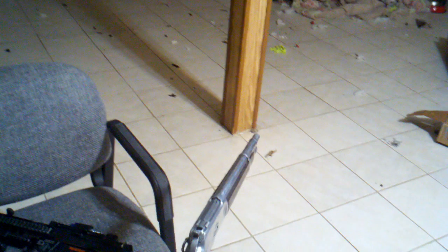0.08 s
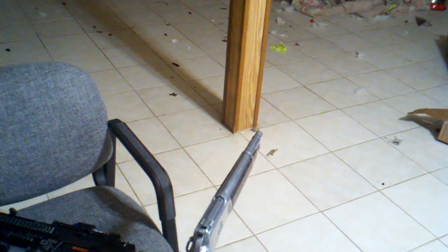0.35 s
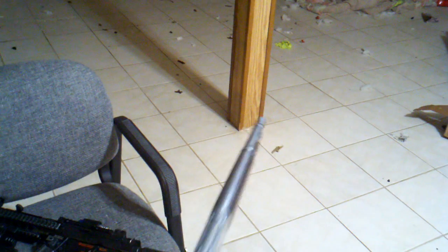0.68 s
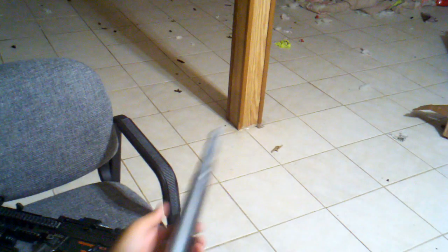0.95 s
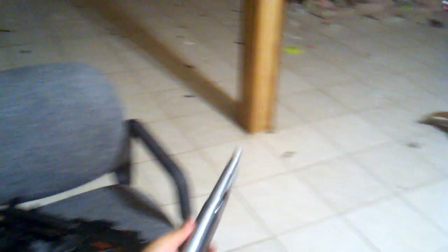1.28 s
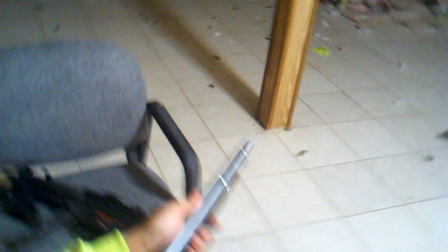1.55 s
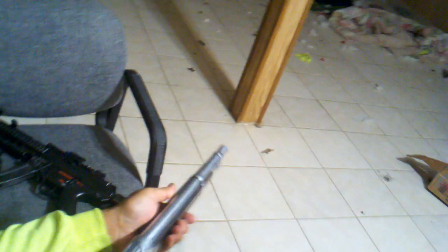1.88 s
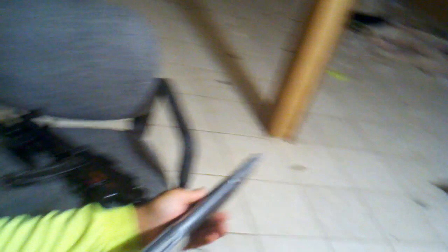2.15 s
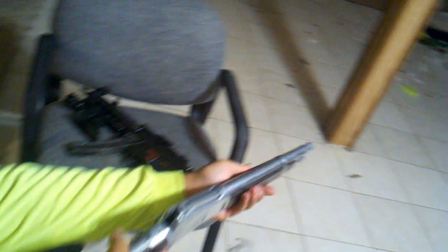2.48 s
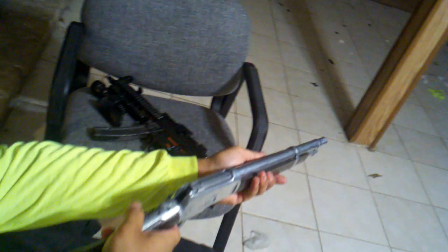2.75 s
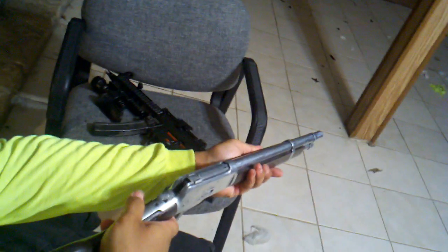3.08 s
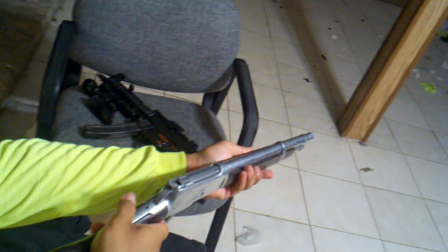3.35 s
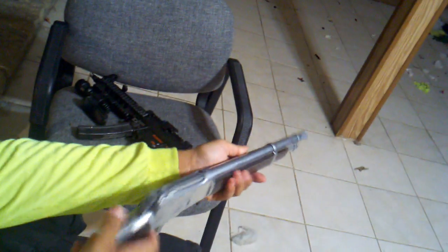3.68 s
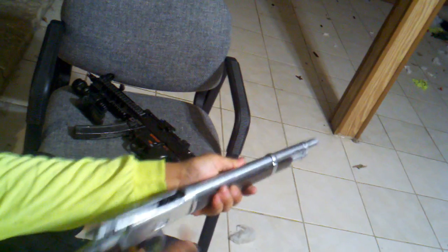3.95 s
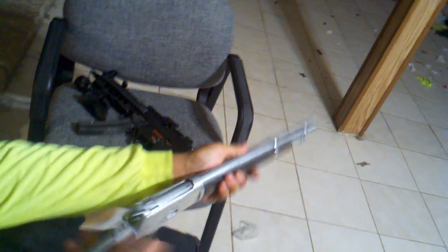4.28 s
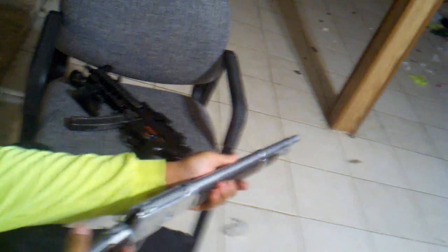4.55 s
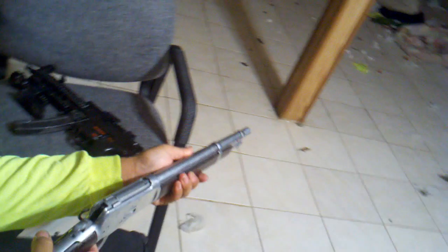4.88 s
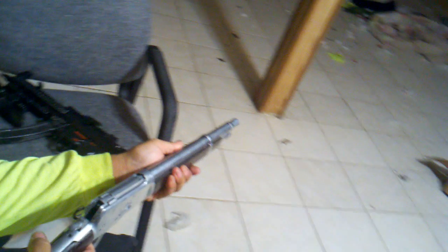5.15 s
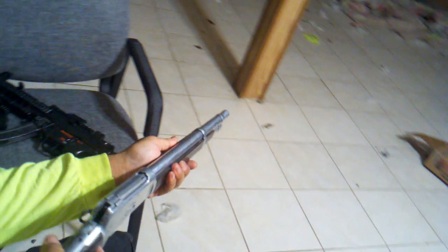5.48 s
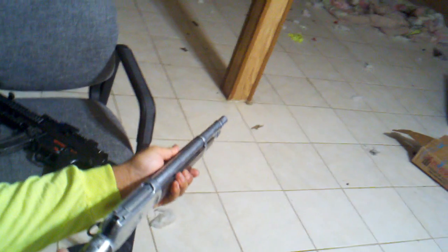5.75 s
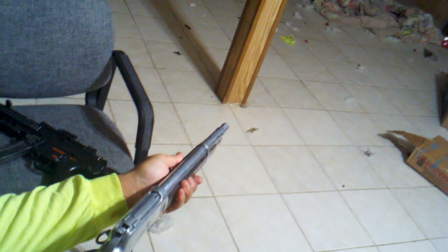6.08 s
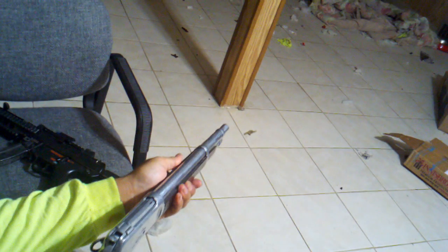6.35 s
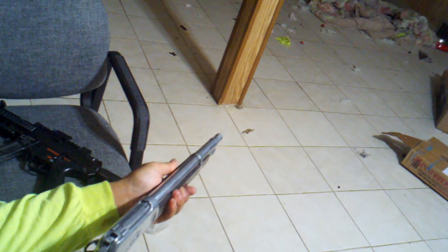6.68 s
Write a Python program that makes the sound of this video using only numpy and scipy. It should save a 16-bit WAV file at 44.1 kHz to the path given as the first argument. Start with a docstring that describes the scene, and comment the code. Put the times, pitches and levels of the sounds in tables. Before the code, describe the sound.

A tiled room rings from an airsoft rifle shot just fired. The rifle's metal lever scrapes open with a click and snaps shut. A sharp crack follows, and the pellet ticks across the room. The lever is worked again, a last shot and its pellet ring out, and a sleeve brushes faintly past. A fan hums softly throughout. The microphones are close, with a wide stereo sound.

```python
"""A tiled room rings from a shot of a spring-powered airsoft rifle, and a fan hums faintly throughout.
The rifle's lever scrapes open, loading the spring, and snaps shut. The next shot is a trigger click,
a rush of the piston, a pop at the muzzle and the piston's slam; the pellet strikes across the room.
The lever is worked again, a last shot and its pellet follow, and a sleeve brushes past.
All is heard through two close microphones, widened in stereo and turned down after loud sounds."""
import sys
import numpy as np
from scipy import signal
from scipy.fft import rfft, irfft, next_fast_len
from scipy.io import wavfile

SR = 44100
rng = np.random.default_rng(int(sys.argv[2]) if len(sys.argv) > 2 else 0)


def master_out(mix):
    """Clip the mix to full scale and print it as 16-bit PCM to the path in sys.argv[1]."""
    frames = np.transpose(np.atleast_2d(mix))
    ceiling = np.clip(frames, -1, 1)
    pcm = np.round(ceiling * 32767).astype(np.int16)
    wavfile.write(sys.argv[1], SR, pcm)


N = 300762
LEAD = SR // 2  # extra samples, so that sound begun before time zero still rings
TIME = np.arange(-LEAD, N) / SR
EDGE_HZ = 14150  # upper limit of the sound

# tone of a sharp bang heard from across the room: f/Hz, level/dB
FAR_BANG = [(60, -23.5), (170, -5.5), (290, -1), (370, 3), (700, 0), (1200, -0.5), (2000, -0.5),
            (2700, -5.5), (3600, -4.5), (5000, -7.5), (7000, -2.5), (9000, -1.5), (14000, -10)]
# the lever swings open until the sear, a hook that holds the loaded spring, catches:
# start t/s, sear t/s, latch's lead on the sear/s, teeth level/dB, scrape level/dB, sear level/dB
LEVER_OPENS = [(1.1913, 1.2739, .0066, -23, -38, -6.5), (3.8739, 3.965, 0.0094, -26.5, -36, -12)]
# the lever swings back: start t/s, shut t/s, rattle level/dB, scrape level/dB, snag level/dB, stop level/dB
LEVER_SHUTS = [(1.588, 1.6485, -23.5, -31.5, -14.5, -11), (4.2965, 4.355, -23, -26, -29, -11)]


def amp(db):
    """Turns decibels into a gain."""
    return 10 ** (np.asarray(db) / 20)


def value_at(points, hz):
    """Looks up a table between its rows, on a logarithmic frequency scale."""
    f, value = np.transpose(points)
    return np.interp(np.log(hz + 1), np.log(f), value)


def add(mix, s, sound):
    """Mixes a sound in at s seconds."""
    part = mix[:, LEAD + round(s * SR):][:, :sound.shape[-1]]
    part += sound[..., :part.shape[1]]


def colour(x, points, keep_power=True, size=4096):
    """Gives x the tone in a table; with keep_power, white noise keeps about the same strength."""
    gain = amp(value_at(points, abs(np.fft.fftfreq(size, 1 / SR))))
    if keep_power:
        gain = gain / np.sqrt(np.mean(gain[:round(size * EDGE_HZ / SR)] ** 2))
    taps = np.fft.ifft(np.exp(signal.hilbert(np.log(gain)).conj())).real  # never rings ahead of a hit
    return signal.oaconvolve(x, taps[None, :size // 2], axes=1)[:, :x.shape[1]]


def resonate(x, hz, width_hz):
    """Makes x ring at a pitch, which may be steady or gliding."""
    turn = np.exp(2j * np.pi * np.cumsum(hz * np.ones(x.shape[1])) / SR)
    feedback = np.exp(-np.pi * width_hz / SR)
    return 2 * (turn * signal.lfilter([1 - feedback], [1, -feedback], x / turn + 1e-18)).real


def burst(db, decay_s, size=4096):
    """Parts chatter as they touch: a sudden start and a quick end, with all pitches equally strong."""
    fade = np.exp(-np.arange(size) / SR / decay_s)
    spectrum = rfft(rng.standard_normal((2, size)) * fade)
    click = irfft(spectrum / abs(spectrum))[:, :size // 2]
    return amp(db) * click * np.linalg.norm(fade) / np.linalg.norm(click, axis=1, keepdims=True)


def puff(db, hz, rise_s, size=2048):
    """A push of air in the first channel: it swells, swings back and dies within a few cycles."""
    t = np.arange(size) / SR
    swell = (t / rise_s * np.exp(1 - t / rise_s)) ** 2
    return amp(db) * np.sin(2 * np.pi * hz * t) * swell * np.array([[1], [0]])


def shots(stock_db=-18, metal_to_room_db=-10, thump_hz=235, thump_decay_s=0.0015, right_share=0.34):
    """A spring slams a piston home. Returns the near sound, the push of air and what enters the room."""
    # slam t/s, slam level/dB, trigger level/dB, muzzle pop level/dB, air push level/dB, blast level/dB
    firings = [(-.112, -7, -12, -6, 0, 26.5), (3.1952, 8.5, -25, -1, 14.5, 22),
               (6.0096, 11.5, -16, -9, -3, 25.5)]
    # tone of the piston's slam: f/Hz, level/dB
    slam_tone = [(40, 0), (150, 3), (400, 2.5), (1200, -2.5), (2500, 0.5), (4000, -1.5), (5200, -0.5),
                 (6600, -0.5), (7800, -2), (9100, 4), (10200, 0), (11300, 1), (14000, -5.5)]
    metal, pop, push, stock, blast = np.zeros((5, 2, len(TIME)))
    t = np.arange(2048) / SR
    thump = np.sin(2 * np.pi * thump_hz * t) * np.exp(-t / thump_decay_s)
    for s, db, trigger_db, pop_db, push_db, blast_db in firings:
        add(metal, s - 0.0168, burst(trigger_db, decay_s=0.004))
        add(metal, s - 0.0066, burst(db - 22, decay_s=0.028))  # the freed spring drives the piston
        add(metal, s - 0.0016, burst(db - 17.5, decay_s=0.0057))
        add(pop, s - 0.0028, puff(pop_db, hz=1318, rise_s=0.0003))  # air leaves the muzzle
        add(metal, s, burst(db, decay_s=0.0016))  # the piston hits the end of its cylinder
        add(metal, s + 0.0033, burst(db - 16, decay_s=0.019))  # the spring shudders
        add(push, s, amp(push_db) * thump * np.array([[1], [right_share]]))
        add(stock, s, burst(db + stock_db, decay_s=0.002))  # the hollow stock takes the blow
        add(blast, s, amp(blast_db) * np.ones(1))  # from afar the shot is one sharp spike
    metal = colour(metal, slam_tone)
    knock = amp(12) * resonate(stock, hz=490, width_hz=340)
    return metal + pop + knock, push, colour(blast, FAR_BANG) + amp(metal_to_room_db) * metal


def room(x, build_s, gap_s):
    """Echoes off the tiles swell after a short gap, then each pitch dies at its own speed."""
    # how long the room rings: f/Hz, time to fade by 60 dB/s
    ring_times = [(100, 0.8), (350, 0.51), (700, 0.58), (1500, 0.66), (3500, 0.71), (6000, .62),
                  (9000, 0.54), (13500, 0.48)]
    hz, t, noise = signal.stft(rng.standard_normal((2, SR)), SR, nperseg=256)
    fade = np.exp(-np.log(1000) * t / value_at(ring_times, hz)[:, None])
    tail = signal.istft(noise * fade, SR, nperseg=256)[1][:, :SR]
    tail *= 1 - np.exp(-np.maximum(np.arange(SR) / SR - gap_s, 0) / build_s)
    return signal.fftconvolve(x, tail / np.linalg.norm(tail[0]), axes=1)[:, :len(TIME)]


def fan(air_db=-58, side_db=-10, boost_db=5, volume_creep_db_per_s=0.6733):
    """A steady fan's soft rush of air and hum, heard gradually louder as the microphone volume creeps up."""
    # tone of the moving air: f/Hz, level/dB
    air_tone = [(30, -21.5), (70, -9.5), (120, -4.5), (210, 2), (320, 2), (520, -1.5), (750, -7.5),
                (1100, -13), (2000, -15), (3000, -21), (3800, -23), (5200, -28.5), (9000, -26),
                (14000, -26)]
    # the hum's tones: f/Hz, level/dB before the boost and volume creep
    hum_tones = [(226, -75.5), (510.7, -58), (570, -73.5)]
    air = amp(air_db) * microphones(colour(rng.standard_normal((2, len(TIME))), air_tone))
    hum = sum(amp(db) * np.sqrt(2) * np.cos(2 * np.pi * hz * TIME) for hz, db in hum_tones)
    lean_left = amp(side_db) * hum * np.array([[1], [-1]])
    return (air + hum + lean_left) * amp(boost_db + volume_creep_db_per_s * TIME)


def lever_clicks(rattle_times_s=(0, 0.006, 0.018), rattle_rise_db_per_s=153):
    """Parts meet, each click given as t/s, level/dB, decay/s, relative knock/dB, relative ping/dB."""
    # teeth passed as the lever opens: t/s from the start of the swing
    teeth = [0, .0185, .0298, .0415, .0595]
    # the rifle ticks in the hands: t/s, level/dB, relative knock of the stock/dB
    hand_ticks = [(1.0524, -32.5, -4), (1.0785, -49.5, 12), (3.71, -47, 7), (4.2085, -34, -5),
                  (4.287, -33, -7), (4.384, -25, 0.5)]
    # kinds of click: decay/s, relative knock/dB, relative ping/dB
    tooth, catch = (0.0026, -12.5, 3), (0.0024, -27, 7.2)
    rattle, snag, stop = (0.0087, -18, -1), (0.0018, -14, -2), (0.0017, 0, 4.6)
    for start, sear, latch_lead, teeth_db, _, sear_db in LEVER_OPENS:
        yield start - 0.017, teeth_db - 12, *tooth  # slack is taken up just before the lever moves
        for after in teeth:
            yield start + after, teeth_db, *tooth
        yield sear - latch_lead, sear_db - 6.5, *catch  # the latch
        yield sear, sear_db, *catch
    for start, shut, rattle_db, _, snag_db, stop_db in LEVER_SHUTS:
        for after in rattle_times_s:  # the rattle grows with speed
            yield start + after, rattle_db - rattle_rise_db_per_s * (rattle_times_s[-1] - after), *rattle
        yield start + 0.025, snag_db, *snag
        yield shut, stop_db, *stop
    for s, db, knock_db in hand_ticks:
        yield s, db, 0.0024, knock_db, -11.5


def lever_scrapes(free_s=0.011):
    """Sliding parts stick and slip, but run free just before shutting. Yields start time and sound."""
    slides = [(start, sear, db) for start, sear, _, _, db, _ in LEVER_OPENS]
    slides += [(start, shut - free_s, db) for start, shut, _, db, _, _ in LEVER_SHUTS]
    for start, end, db in slides:
        size = max(round((end - start) * SR), 64)
        grip = amp(3.2 * rng.standard_normal(SR // 64)).repeat(64)[:size]
        grit = rng.standard_normal((2, SR))[:, :size] * grip
        yield start, amp(db) * grit / grit.std() * signal.windows.tukey(size, 0.2)


def lever_pitches(slack_hz=1580, loaded_hz=1780, return_hz=1710, shut_hz=1460, load_s=0.015):
    """The ring jumps up as the spring loads and sinks as the lever returns: t/s, ring f/Hz, ping f/Hz."""
    ping_out_hz, ping_back_hz = 12000, 13300
    for (start, sear, *_), (back, shut, *_) in zip(LEVER_OPENS, LEVER_SHUTS):
        yield start, slack_hz, ping_out_hz
        yield sear - load_s, slack_hz, ping_out_hz
        yield sear, loaded_hz, ping_out_hz
        yield back, return_hz, ping_back_hz
        yield shut, shut_hz, ping_back_hz


def lever():
    """Clicks and scrapes ring the steel and knock the stock. Returns near sound and what enters the room."""
    # tone of the steel parts: f/Hz, level/dB
    steel_tone = [(100, -11), (500, -10.5), (900, -14.5), (1400, 3), (2300, 1.5), (3800, 1.5), (4800, 4.5),
                  (5600, -2.5), (6400, 7), (7400, 1), (8800, 6.5), (10400, 0.5), (12000, 0), (14000, -10.5)]
    # tone of the hollow stock, the part held to the shoulder: f/Hz, level/dB
    stock_tone = [(40, -14.5), (150, -12), (300, -6), (550, 0.5), (900, -5), (1400, 2.5), (2400, -5.5),
                  (5000, 1.5), (14000, -48)]
    shaking, knocks, pings = np.zeros((3, 2, len(TIME)))
    for s, db, decay_s, knock_db, ping_db in lever_clicks():
        add(shaking, s, burst(db, decay_s))
        add(pings, s, burst(db + ping_db, decay_s))
        add(knocks, s, burst(db + knock_db, decay_s=0.0029))
    for s, scrape in lever_scrapes():
        add(shaking, s, scrape)
    times, ring_hz, ping_hz = np.transpose(list(lever_pitches()))
    steel = amp(-1) * colour(shaking, steel_tone)
    knock = colour(knocks, stock_tone)
    ring = amp(7) * resonate(shaking, np.interp(TIME, times, ring_hz), width_hz=140)
    ping = amp(5.5) * resonate(pings, np.interp(TIME, times, ping_hz), width_hz=850)
    to_room = amp(-6) * steel + amp(-6.5) * ring + amp(-18) * ping + amp(-12) * knock
    return steel + ring + ping + knock, to_room


def jolts(relative_db=-27):
    """Each swing of the lever ends by jerking the rifle: a soft low thud in the left microphone."""
    thuds = np.zeros((2, len(TIME)))
    for _, s, *_, db in LEVER_OPENS + LEVER_SHUTS:
        add(thuds, s, puff(db + relative_db, hz=100, rise_s=0.0016))
    return thuds


def pellets():
    """A plastic pellet strikes and bounces some way off."""
    # hits across the room: t/s, level/dB
    strikes = [(3.2264, -13.5), (3.239, -11), (6.039, -4.5), (6.099, -7)]
    hits = np.zeros((2, len(TIME)))
    for s, db in strikes:
        add(hits, s, burst(db, decay_s=0.0014))
    return colour(hits, FAR_BANG)


def sleeve(start_s=6.64, length_s=0.17, rise_s=0.016, db=-51):
    """Cloth brushes past: a faint high rustle that starts quickly and thins out."""
    # tone of rubbing cloth: f/Hz, level/dB
    cloth_tone = [(1000, -25), (5000, -14), (8000, -2), (12000, 2), (14000, -4)]
    t = np.arange(0, length_s, 1 / SR)
    shape = np.minimum(t / rise_s, 1) * (1 - t / length_s)
    rustle = np.zeros((2, len(TIME)))
    add(rustle, start_s, amp(db) * shape * rng.standard_normal((2, SR))[:, :len(t)])
    return colour(rustle, cloth_tone)


def microphones(x):
    """Turns two unrelated signals into two close microphones, most alike in the low middle pitches."""
    # what sets left and right apart, relative to what they share: f/Hz, level/dB
    spread = [(100, -1.5), (300, -10), (600, -8), (1300, 2.5), (2500, -0.5), (14000, 0)]
    apart = colour(x[1:], spread, keep_power=False)[0]
    return np.array([x[0] + apart, x[0] - apart])


def scene(pellet_to_room_db=-8, balance_db=0.14):
    """Rifle, room, fan and sleeve at the two microphones, the right one a little more sensitive."""
    crack, push, blast = shots()
    cocking, clatter = lever()
    strikes = pellets()
    # the muzzle points away, so its blast comes back later than the clatter
    echoes = room(blast, build_s=0.018, gap_s=0.0063)
    echoes += room(clatter + amp(pellet_to_room_db) * strikes, build_s=0.0031, gap_s=0.0023)
    mix = microphones(crack + cocking + strikes + echoes) + push + jolts() + fan() + sleeve()
    return mix[:, LEAD:] * amp([[-balance_db], [balance_db]])


def widen(x, delay_s=1 / 2607):
    """Each side subtracts a delayed copy of the other, which widens the sound and notches some pitches."""
    # strength of that copy: f/Hz, level/dB (capped at 0 dB below)
    crossfeed = [(100, 2), (1300, 3.36), (2700, 2), (4000, -7), (5300, -8.5), (8000, -15), (13000, -10)]
    size = next_fast_len(N + SR)
    hz = np.fft.rfftfreq(size, 1 / SR)
    share = np.minimum(amp(value_at(crossfeed, hz)), 1)
    delay = np.exp(-2j * np.pi * hz * delay_s)
    spectrum = rfft(x, size)
    return irfft(spectrum - share * delay * spectrum[::-1], size)[:, :N]


def turn_down(x, share, recover_db_per_s, start_cut_db=0, threshold_db=-12):
    """Cuts the volume at once by a share of any excess over the threshold, then lets it creep back."""
    power = signal.lfilter([1 / 64], [1, 1 / 64 - 1], (x ** 2).mean(0))
    wanted_cut_db = share * np.maximum(10 * np.log10(power + 1e-12) - threshold_db, 0)
    recovery_db = recover_db_per_s * np.arange(N) / SR
    cut_db = np.maximum(np.maximum.accumulate(wanted_cut_db + recovery_db), start_cut_db) - recovery_db
    return x / amp(cut_db)


def record(dry):
    """Widens the stereo, tames loud sounds, flattens overloaded peaks and removes the highest treble."""
    x = turn_down(widen(dry), share=0.78, recover_db_per_s=2.5, start_cut_db=13.5)  # slow volume control
    x = turn_down(x, share=0.38, recover_db_per_s=66)  # quick limiter
    lowpass = signal.firwin(401, EDGE_HZ, window=("kaiser", 7), fs=SR)
    return signal.oaconvolve(np.clip(x, -1, 1), lowpass[None], "same")


dry = scene()
out = record(dry)
master_out(out)
```